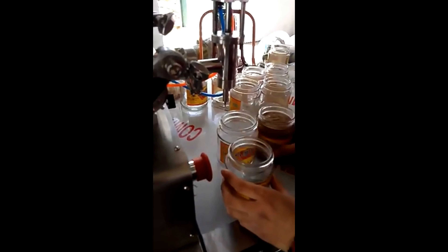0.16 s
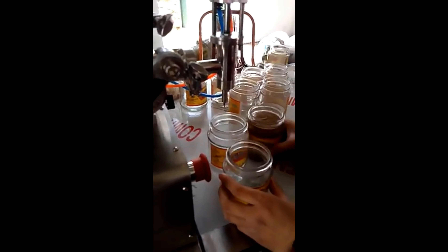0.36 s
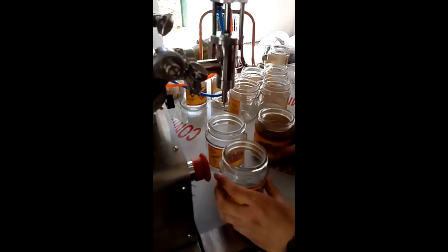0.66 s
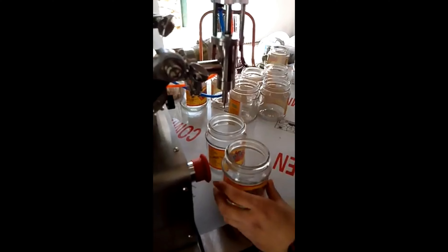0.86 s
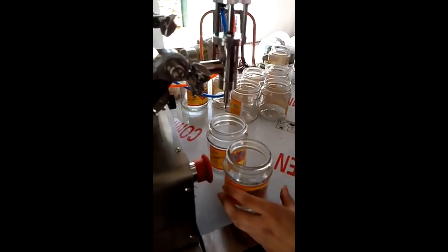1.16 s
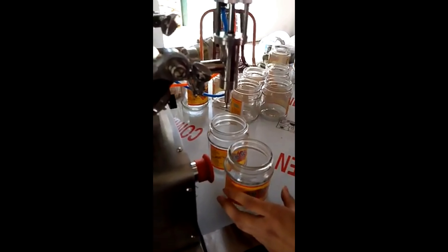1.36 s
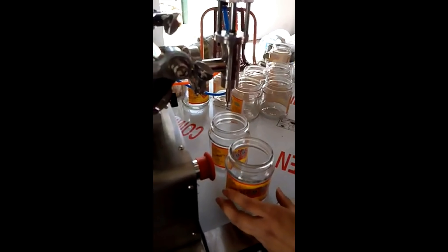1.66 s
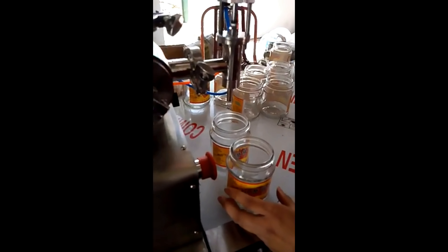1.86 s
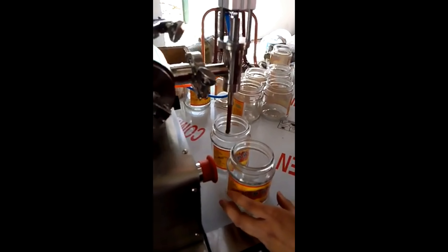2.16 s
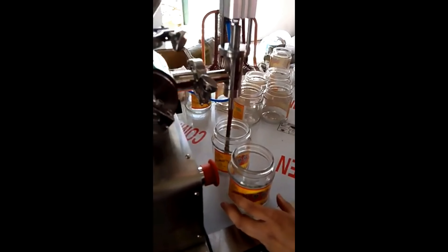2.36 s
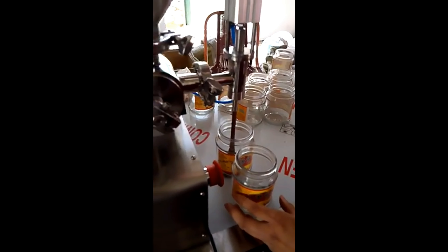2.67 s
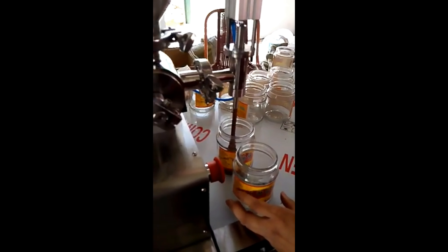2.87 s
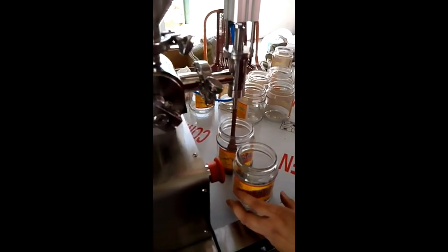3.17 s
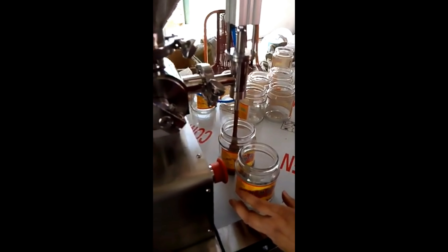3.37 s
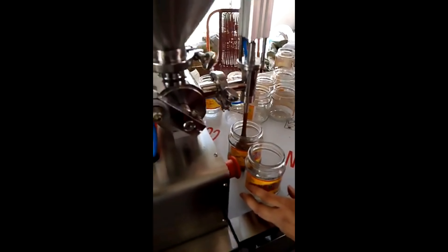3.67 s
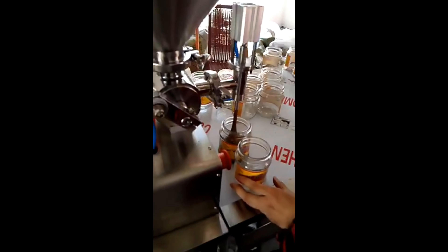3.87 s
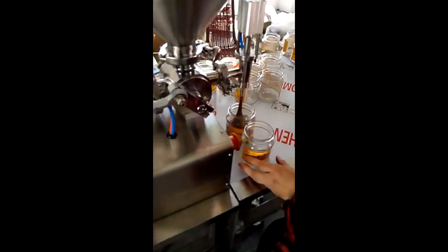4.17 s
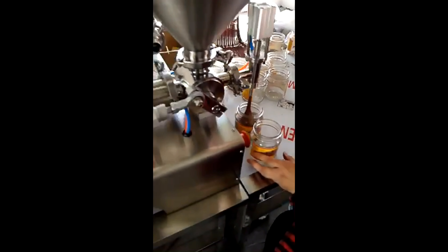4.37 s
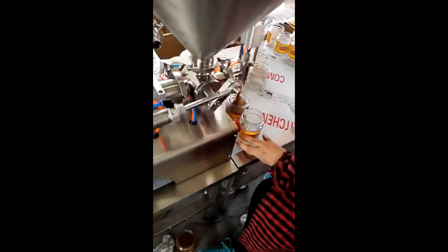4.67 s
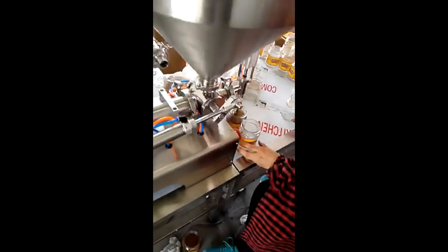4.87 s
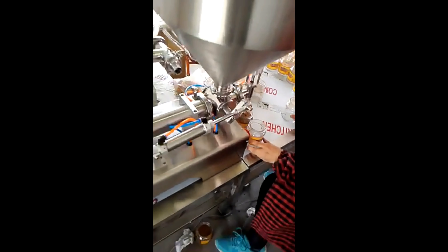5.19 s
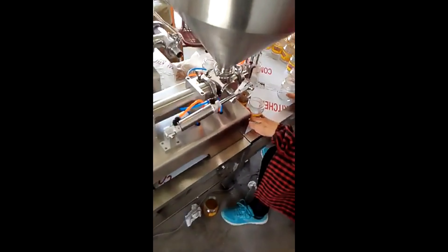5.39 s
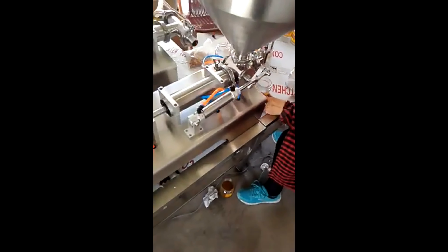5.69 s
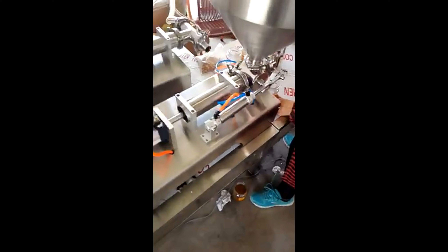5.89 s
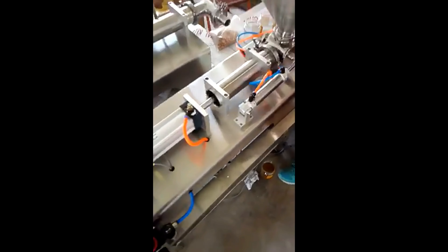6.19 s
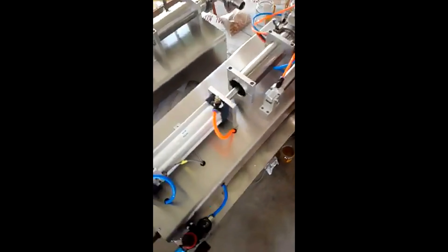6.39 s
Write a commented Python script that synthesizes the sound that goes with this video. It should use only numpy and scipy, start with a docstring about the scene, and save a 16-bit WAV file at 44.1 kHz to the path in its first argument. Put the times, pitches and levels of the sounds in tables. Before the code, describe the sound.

A pneumatic filling machine runs close by in a workshop, hissing over the throbbing hum of an air compressor. Glass jars clink lightly. A valve dumps a loud burst of air with a thud, steel parts clack, and a whistling hiss slowly fades among more clinks and knocks. After a short lull comes a second burst, more knocks and a softer hiss. The hand-held microphone sounds dull on the right side.

```python
"""A pneumatic piston filler doses syrup into glass jars, close to a hand-held microphone pair in a workshop.
At each reversal a valve dumps air in a loud burst, the rotary valve clacks over, and the cylinder vents
through a whistling throttle. Jars clink; an air compressor throbs and a fitting leaks throughout.
The microphones move along the machine; the right one is covered and sounds dull."""
import sys
import numpy as np
from scipy import signal
from scipy.fft import rfft, irfft, next_fast_len
from scipy.io import wavfile
from scipy.ndimage import map_coordinates

SR = 44100
rng = np.random.default_rng(int(sys.argv[2]) if len(sys.argv) > 2 else 0)


def materialize(psi):
    """Save the field psi as 16-bit PCM at rate SR to the path in sys.argv[1].

    A 1-D psi becomes a single channel; in a 2-D psi each row is a channel.
    """
    bounded = np.clip(np.atleast_2d(psi).T, -1, 1)
    quanta = np.round(bounded * 32767).astype(np.int16)
    wavfile.write(sys.argv[1], SR, quanta)


N = 288414
TIME = np.arange(N) / SR
SHAFT_HZ = 23.35  # compressor crankshaft
# microphone path: t/s, place (0 nozzle, 1 hopper, 2 cylinder)
MIC_PATH = [(0, 0), (3.3, 0), (3.7, 0), (4.3, -1), (5.1, 2), (5.8, 1.5), (6.54, 1.5)]
# the valve snaps over to feed, return, feed: t/s
STROKE_STARTS = (-1.4, 1.4615, 4.3095)


def amp(db):
    """Decibels to gain."""
    return 10 ** (np.asarray(db) / 20)


def unit(x):
    """Scale to rms 1."""
    return x / np.sqrt(np.mean(x ** 2) + 1e-20)


def along(points, hz):
    """Interpolate (f/Hz, value) points on a log frequency axis."""
    f, values = np.transpose(points)
    return np.interp(np.log(hz + 1), np.log(f + 1), values)


def lift(peaks, f):
    """Decibels that resonances (f/Hz, width/Hz, lift/dB) add at frequency f."""
    return sum(db / (1 + (2 * (f - hz) / width) ** 2) for hz, width, db in peaks)


def wobble(rate):
    """A smooth random curve, rate knots a second."""
    return map_coordinates(rng.standard_normal(int(N * rate / SR) + 4), [TIME * rate])


def filtered(x, response):
    """Apply a frequency response to x."""
    n = x.shape[-1]
    padded = next_fast_len(n + 8192)
    return irfft(rfft(x, padded) * response(np.fft.rfftfreq(padded, 1 / SR)), padded)[..., :n]


def noise(spectrum, peaks=(), size=N):
    """Noise of rms 1 with a broad spectrum, lifted at resonances, falling away below its first point."""
    low_cut = lambda f: np.minimum(f / spectrum[0][0], 1) ** 2
    colour = lambda f: amp(along(spectrum, f) + lift(peaks, f)) * low_cut(f)
    return unit(filtered(rng.standard_normal(size), colour))


def gate(start, end, rise_s, release_db_per_s):
    """A valve's gain: it opens quickly, holds, then dies away."""
    return np.clip((TIME - start) / rise_s, 0, 1) * amp(-release_db_per_s * np.maximum(TIME - end, 0))


def ring(modes, t, pitch=1, attack_s=0.00045):
    """Damped modes, at slightly new strengths for every blow."""
    tones = sum(amp(db + rng.normal(0, 2.3) - 60 * t / t60) * np.sin(2 * np.pi * hz * pitch * t)
                for hz, db, t60 in modes)
    return tones * (1 - np.exp(-t / attack_s))


def add(track, start, sound):
    """Mix a sound into a track from start seconds on."""
    part = track[max(round(start * SR), 0):][:len(sound)]
    part += sound[:len(part)]


def pump_hum(turn, waver_db=2.0, standing_db=2.5, count=80, second_piston_turns=0.509):
    """Shaft harmonics ring in tank and room, swelling and fading as the microphones cross standing waves."""
    # pumping pulse spectrum: f/Hz, level/dB
    pulse = [(23, -57), (46.7, -47.5), (93, -59), (175, -56.5), (260, -50.5), (330, -51), (380, -61.5),
             (480, -67), (560, -58), (1100, -60.5), (1400, -55.5), (2000, -72)]
    # tank and room resonances: f/Hz, width/Hz, lift/dB, change per microphone place/dB
    tank = [(175, 61, 1, -3.5), (232.6, 5.5, 6.5, -3), (257, 5.4, 11, 0.5), (304, 7.2, 3, 4),
            (327, 17, 5, 3.5), (570.7, 41, 17, -3), (607, 13, -8.5, 6.5), (700, 11, 14, 1.3),
            (729.7, 24.6, 11.5, 1.8), (840, 12, 0, 5), (957, 12, 7.5, 3), (1004, 12, 13, 1.6),
            (1051, 9.8, 9.5, -6), (1378, 12, 7.5, -3.5)]
    knots = np.linspace(0, N / SR, num=34)
    place = np.interp(knots, *np.transpose(MIC_PATH))
    resonances = [(hz, width, db + change_db * place) for hz, width, db, change_db in tank]
    out = np.zeros(N)
    for order in range(1, count + 1):
        hz = order * SHAFT_HZ
        # the pistons pump about half a turn apart: odd harmonics cancel in the bass, where pulses match
        alike = np.exp(-hz / 1440)
        pair = (1 + alike * np.exp(-2j * np.pi * order * second_piston_turns)) / (1 + alike)
        standing = np.cos(2 * np.pi * (place / 2.78 + rng.random())) * np.sqrt(order / count)
        db = along(pulse, hz) + lift(resonances, hz) + standing_db * standing
        db += waver_db * rng.standard_normal(len(knots))
        chirp = np.pi * 6e-6 * (hz - 1500) ** 2  # each pulse is a short falling sweep
        phase = np.angle(pair) + chirp + 0.6 * rng.standard_normal()  # the room scatters the phases
        out += np.interp(TIME, knots, abs(pair) * amp(db)) * np.cos(order * turn + phase)
    return out


def compressor(chuff_db=-44, throb_db=-2.0, tick_db=-48, tick_t60=0.026):
    """Two pistons pump once a turn each: a throbbing hum, with a chuff and a valve tick on each stroke."""
    # chuff as heard in the room: f/Hz, level/dB
    chuff_spectrum = [(15, -25), (40, -21), (70, -4), (120, -4.5), (200, -6.5), (450, -1.5), (750, 4),
                      (1150, -4.5), (1700, -9.5), (2700, -7), (6000, -47)]
    tick_spectrum = [(800, -10.5), (1100, 4), (1500, -7), (2300, -5.0), (5000, -14), (13000, -26)]
    turn = 2 * np.pi * SHAFT_HZ * TIME + 0.0065 * wobble(3.18)
    chuff = unit(noise(chuff_spectrum) * amp(throb_db * np.cos(2 * turn)))
    since_stroke = TIME % (0.5 / SHAFT_HZ)
    ticks = unit(noise(tick_spectrum) * amp(-60 * since_stroke / tick_t60))
    return pump_hum(turn) + amp(chuff_db) * chuff + amp(tick_db) * ticks


def leak(level_db=-36.0, throb_db=0.9):
    """Air hisses steadily from a fitting, pulsing slightly with the compressor."""
    # escaping air: f/Hz, level/dB
    hiss = [(1500, -3), (2800, -20), (3500, -2), (4200, -0.5), (6000, -7), (7400, -0.5), (8700, 0.5),
            (10500, -10.5), (12000, -19), (14400, -21)]
    return amp(level_db + throb_db * np.cos(4 * np.pi * SHAFT_HZ * TIME)) * noise(hiss)


def throttles(flutter_db=0.83):
    """The piston drives air through a throttle, sagging with the pressure; the jet makes the hose whistle."""
    # feed, return, feed: travel/s, level/dB, sag/(dB/s), opening surge/dB, surge decay/s
    strokes = [(2.86, -22.5, 1.11, 0, .2), (2.07, -21, 6.5, 11, 0.065), (2.86, -28, 1.1, 7, 0.36)]
    # jet of each stroke: f/Hz, level/dB
    feed_jet = [(800, -19), (1800, -6), (2700, -5.5), (3600, -6.5), (5500, -0.5), (7500, -1), (9500, -5),
                (11500, -13), (14000, -18)]
    return_jet = [(800, -38), (1800, -6), (2800, -10.5), (3500, -1.5), (5000, -5.5), (6500, -2.5),
                  (8000, -7), (10000, -12), (14000, -26)]
    refeed_jet = [(800, -31), (1800, -6), (2400, -9.5), (3300, -5), (4300, -3), (5100, -2), (7700, 0),
                  (9500, -5.5), (11500, -12), (14000, -22)]
    # throttle and hose resonances of each stroke: f/Hz, width/Hz, lift/dB
    feed_hose = [(3110, 120, 8), (3810, 320, 9.5), (4990, 130, 9), (6230, 99, 3), (6820, 300, 14),
                 (8160, 83, 5)]
    return_hose = [(3639, 120, 10.6), (4766, 166, 14.9), (5144, 240, 13), (5590, 240, 10), (7220, 140, 9.1),
                   (8500, 260, 6.2)]
    refeed_hose = [(3025, 52, 9), (4330, 220, 7), (4750, 200, -2.5), (5130, 110, 0)]
    jets = [noise(feed_jet, feed_hose), noise(return_jet, return_hose), noise(refeed_jet, refeed_hose)]
    out = np.zeros(N)
    for start, (travel_s, db, sag, surge_db, surge_s), jet in zip(STROKE_STARTS, strokes, jets):
        age = np.maximum(TIME - start, 0)
        flow_db = db - sag * age + surge_db * np.exp(-age / surge_s) + flutter_db * wobble(45)
        out += gate(start, start + travel_s, rise_s=0.021, release_db_per_s=23) * amp(flow_db) * jet
    return out


def jars():
    """Hand-damped glass jars touch, ring briefly and knock on the table."""
    # contacts: t/s, ring level/dB, f/Hz, knock level/dB
    clinks = [(.0072, -10.5, 3138, -19.5), (0.235, -24.5, 3062, -30), (.275, -22, 3132, -26.5),
              (0.3446, -22, 3110, -26.5), (.3556, -19, 3065, -31.5), (.384, -13, 3086, -25),
              (1.125, -20, 3060, -26), (1.1333, -19, 3122, -29), (1.9481, -22, 3082, -28),
              (1.9794, -24.5, 3112, -37), (2.339, -26, 3092, -31.5), (6.4123, -23, 3072, -32.5),
              (6.421, -28, 3092, -33)]
    # jar modes: pitch ratio, level/dB, t60/s
    glass = [(1, -1.2, 0.14), (1.017, -15, 0.072), (2.09, -5, 0.086), (2.37, -8, 0.19), (2.4, -11.5, 0.12),
             (3.12, -9.5, 0.11)]
    out, t = np.zeros(N), np.arange(SR // 4) / SR
    for start, db, hz, knock_db in clinks:
        add(out, start, amp(db) * ring(glass, t, hz) + amp(knock_db) * steel_knock(t))
    return out


def steel_knock(t, favoured_hz=1000, slap_t60=0.072, favour_db=6, tail_t60=0.18, tail_db=-7.5):
    """A blow on sheet steel: a hard slap, then dense damped modes; the struck spot favours one band."""
    # sheet spectrum: f/Hz, level/dB
    body = [(135, -21), (240, 1), (420, -4), (700, .5), (1500, -4), (2400, -3), (3500, -15.5), (6000, -35),
            (14000, -47)]
    # sheet modes: f/Hz, width/Hz, lift/dB
    modes = [(645, 50, -1.5), (873, 33, 5.5), (1117, 8.6, 12), (1144, 7.3, 3), (1490, 45, 3),
             (1770, 43, 12), (2300, 46, 3)]
    sheet = noise(body, modes + [(favoured_hz, 320, favour_db)], size=len(t))
    return sheet * (amp(-60 * t / slap_t60) + amp(tail_db - 60 * t / tail_t60))


def air_dumps(flutter_db=0.6):
    """The valve snaps over and a full chamber empties through its port, fading as its pressure drops."""
    # bursts opening the return and the second feed: level/dB, open time/s, sag/(dB/s)
    bursts = [(-10, 0.15, 51), (-6.5, 0.14, 66)]
    # exhaust ports: f/Hz, level/dB
    return_port = [(150, -32), (220, -2.5), (450, -7), (1200, -9), (2000, -5.5), (3400, -5.5), (5000, -4),
                   (7200, -2.5), (8600, 3.5), (10200, -5.5), (12500, -8), (14000, -18)]
    feed_port = [(150, -33), (220, -31), (450, -22), (1200, -14.5), (2000, -11), (3400, -3), (5000, -4),
                 (7200, -2), (8600, 4), (10200, -3), (12500, -13), (14000, -17)]
    exhausts = [noise(return_port, peaks=[(3530, 290, 6.8), (6820, 180, 15.0)]),
                noise(feed_port, peaks=[(4330, 240, 2.7), (8550, 330, 3.7)])]
    out = np.zeros(N)
    for start, (db, open_s, sag), exhaust in zip(STROKE_STARTS[1:], bursts, exhausts):
        valve = gate(start, start + open_s, rise_s=0.002, release_db_per_s=430)
        out += valve * amp(db - sag * np.maximum(TIME - start, 0)) * exhaust
    return out * amp(flutter_db * wobble(120))


def frame_jolts():
    """The frame kicks and rocks back as pressure arrives."""
    # kicks: t/s, level/dB
    jolts = [(1.466, -14), (1.498, -24.5), (4.314, -17), (4.351, -26), (4.586, -30)]
    # frame modes: f/Hz, level/dB, t60/s
    frame = [(122, -27, 0.13), (184, -6.5, 0.21), (196, -1.5, 0.076), (208, -7, 0.1), (310, -11.5, 0.077)]
    out, t = np.zeros(N), np.arange(SR // 4) / SR
    for start, db in jolts:
        add(out, start, amp(db) * ring(frame, t, attack_s=0.004))
    return out


def clacks(crack_t60=0.044):
    """The valve arm and piston strike their stops: a steel knock with a bright crack."""
    # hits: t/s, level/dB, relative crack level/dB, favoured f/Hz, its lift/dB, slap t60/s
    hits = [(1.601, -18.5, 3, 1480, 19, 0.063), (1.6287, -15.5, 8, 1470, 11, 0.075),
            (1.637, -20, -14, 1390, 1.5, 0.12), (2.1213, -14, -8, 920, 7.5, 0.039),
            (2.240, -24.5, -15, 2000, 6, 0.045), (2.367, -26.5, -14, 950, 16, .04),
            (4.314, -19.5, -2, 2480, -1, 0.047), (4.444, -24, -8, 604, 11.5, 0.11),
            (4.667, -30, -10, 1520, 16, 0.14), (4.89, -37, 18, 3000, 6, 0.017),
            (4.895, -44, 19, 3000, 6, 0.022)]
    crack_spectrum = [(2000, -3), (4500, -1), (8500, 6.5), (14000, -16)]
    out, t = np.zeros(N), np.arange(SR // 4) / SR
    for start, db, crack_db, hz, favour_db, slap_t60 in hits:
        crack = noise(crack_spectrum, size=len(t)) * amp(crack_db - 60 * t / crack_t60)
        add(out, start, amp(db) * (steel_knock(t, hz, slap_t60, favour_db) + crack))
    return out


def workshop(x, wet_db):
    """Add the workshop's tail, each frequency dying at its own speed."""
    # reverberation: f/Hz, t60/s
    decay = [(150, 1), (1000, 0.87), (4000, 0.19), (12000, 0.39)]
    hz, t, spectra = signal.stft(rng.standard_normal(SR // 2), SR, nperseg=256)
    tail = signal.istft(spectra * amp(-60 * t / along(decay, hz)[:, None]), SR, nperseg=256)[1]
    tail = np.pad(tail / np.linalg.norm(tail), (SR // 150, 0))  # pre-delay
    return x + amp(wet_db) * signal.fftconvolve(x, tail)[:N]


def early_echoes(x, echo_db=-10, t60=0.078, radians_per_place=5):
    """Table and hopper add a cluster of close echoes, whose pattern shifts as the microphones move."""
    t = np.arange(SR // 20) / SR
    patterns = rng.standard_normal((2, len(t))) * amp(-60 * t / t60)
    here, there = signal.fftconvolve(x[None], patterns / np.linalg.norm(patterns[0]), axes=1)[:, :N]
    angle = radians_per_place * np.interp(TIME, *np.transpose(MIC_PATH))
    echoes = np.cos(angle) * here + np.sin(angle) * there
    return (x + amp(echo_db) * echoes) / np.hypot(1, amp(echo_db))


def scene():
    """The closely spaced pair hears the same sources; on the covered side the jets' echoes weigh more."""
    air = throttles() + leak() + workshop(air_dumps(), wet_db=-13)
    blows = workshop(frame_jolts() + clacks(), wet_db=-10) + workshop(jars(), wet_db=-7)
    return np.array([early_echoes(air), early_echoes(air, echo_db=-3)]) + blows + compressor()


def record(dry, muffle_hz=300, lag_ms=0.52, right_db=0.75, top_hz=14400):
    """The covered right microphone hears a dull, late copy; peaks clip and the band is limited."""
    cover = lambda f: amp(right_db) / (1 + 1j * f / muffle_hz) / np.hypot(1, (f / 11000) ** 2)
    right = filtered(dry[1], lambda f: cover(f) * np.exp(-2j * np.pi * f * lag_ms / 1000))
    return filtered(np.clip([dry[0], right], -1, 1), lambda f: f < top_hz)


dry = scene()
out = record(dry)
materialize(out)
```